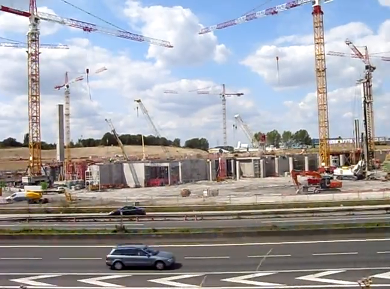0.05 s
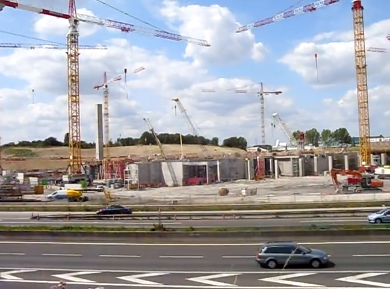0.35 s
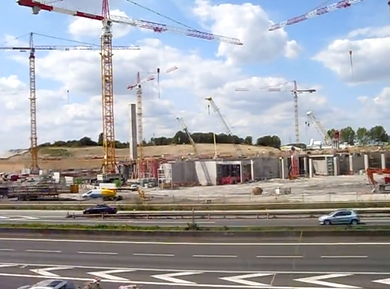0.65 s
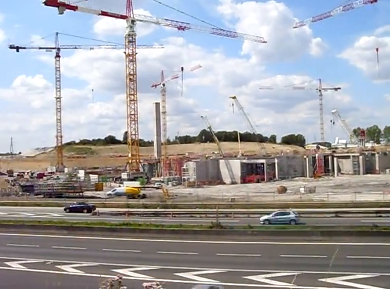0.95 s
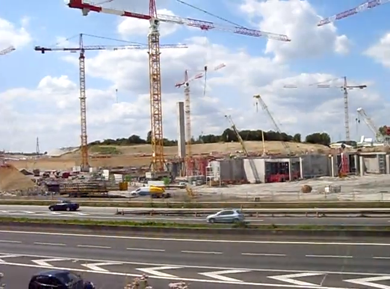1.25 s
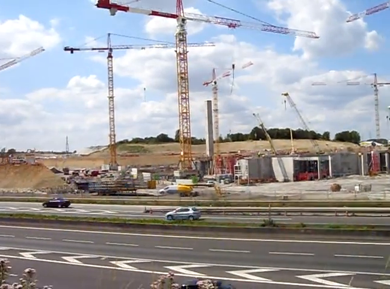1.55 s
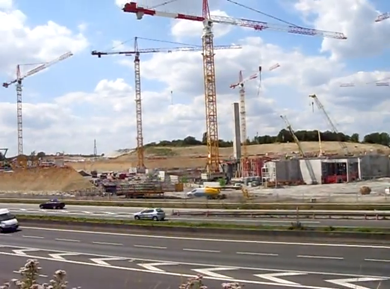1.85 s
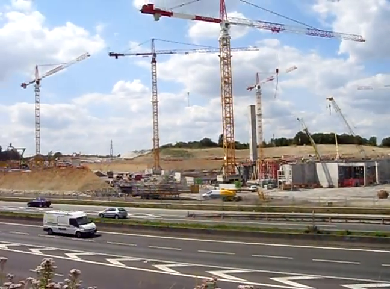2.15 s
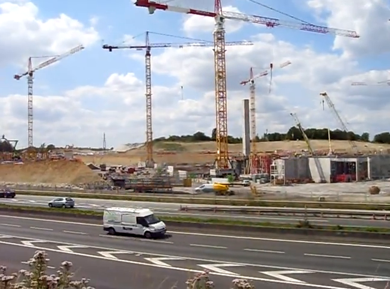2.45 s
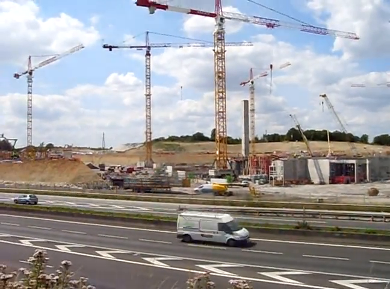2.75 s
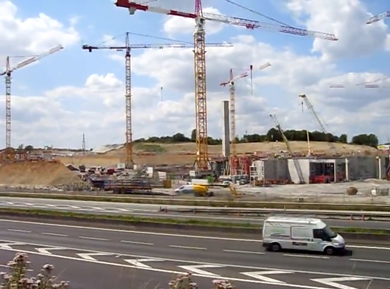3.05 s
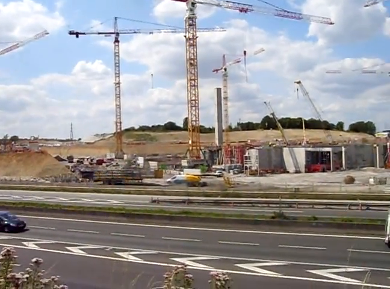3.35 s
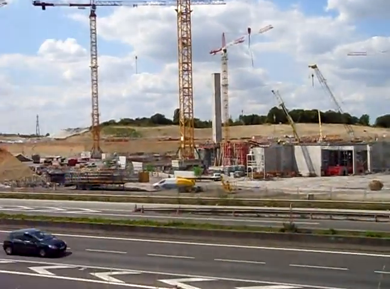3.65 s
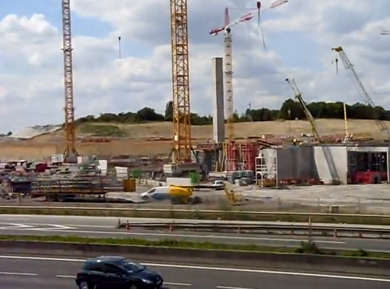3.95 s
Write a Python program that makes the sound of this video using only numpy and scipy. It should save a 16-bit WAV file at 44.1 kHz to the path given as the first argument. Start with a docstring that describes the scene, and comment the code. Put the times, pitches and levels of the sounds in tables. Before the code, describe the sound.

Cars and a van rush past on a busy road, with wind and two clicks.

```python
"""A roar of tyres and a low engine hum open on a busy fast road, heard from an embankment.
Cars and a van sweep by: roar and hiss swell as each draws near, and its hum sinks in pitch
with the Doppler shift. Under them lie far traffic and wind rumbling on a small camera's microphone.
Past the middle the camera's plastic body clicks twice, among a few faint ticks."""
import sys
import numpy as np
from scipy import signal
from scipy.fft import rfft, irfft
from scipy.io import wavfile
from scipy.ndimage import uniform_filter1d

SR = 44100
rng = np.random.default_rng(int(sys.argv[2]) if len(sys.argv) > 2 else 0)


def bounce(signal):
    """Save signal as a 16-bit WAV file at the path given by the first command-line argument."""
    frames = np.transpose(np.atleast_2d(signal))
    limited = np.clip(frames, -1, 1)
    pcm = np.round(limited * 32767).astype(np.int16)
    wavfile.write(sys.argv[1], SR, pcm)


N = 176400
T = np.arange(N) / SR

# pass-bys: (time abreast [s], distance [m], tyre roar [dB], hiss [dB], firing rate [Hz],
# engine hum [dB], half length of the hum [s])
PASS_BYS = [(.2, 22, -32, -56, 64.5, -31.5, 0.26), (1.5, 20, -36, -52, 123, -42.5, .35),
            (2.65, 16, -48, -48, 117.5, -36.5, .22), (3.119, 10, -46, -49.5, 71.87, -30.5, 0.19),
            (3.701, 22, -36, -50, 109.4, -38.5, 0.51)]
# engine harmonics: (multiple of the firing rate, relative level [dB])
ENGINE_HARMONICS = [(1, -3), (2, -17), (3, -23), (4, -22.5)]
# gliding bands of traffic sound, tyre rushes and two low engine tones:
# (peak time [s], half length [s], centre [Hz], glide [Hz/s], width [Hz], level [dB])
TRAFFIC_BANDS = [(0.404, 0.21, 2880, -150, 130, -54.5), (1.45, .3, 1284, 60, 280, -40),
                 (1.751, .3, 2262, 400, 1300, -46.5), (2.0, 0.48, 504, -0.5, 120, -45),
                 (2.446, 0.27, 2243, 101, 470, -47), (2.66, .13, 3963, 199.5, 1600, -49.5),
                 (3.162, 0.13, 2883, -400, 780, -47.5), (3.852, 0.22, 296.4, -10.5, 12, -43),
                 (3.499, 0.15, 201.3, -4.5, 9.6, -44)]
# tone colours of the noise layers: (frequency [Hz], relative density [dB])
TYRE_SPECTRUM = [(100, -10), (250, -10.5), (430, -12), (600, -6.5), (760, 4), (980, 0), (1300, -3),
                 (1900, -14.5), (3000, -25), (6000, -35.5)]
HISS_SPECTRUM = [(300, -23), (1000, -6), (1600, -9), (2100, -1), (2750, 1), (3500, 0.5), (4100, -4.5),
                 (4900, -2.5), (6000, -19)]
WIND_SPECTRUM = [(5, -6.5), (13, 3), (22, -3.5), (35, -0.5), (60, -15), (160, -38.5), (2000, -81.5)]
RUMBLE_SPECTRUM = [(15, -20.5), (35, -6), (50, 0), (70, -2), (100, -9), (150, -17.5), (400, -46.5),
                   (2000, -77.5)]
FAR_SPECTRUM = [(30, -10), (110, -5), (200, -1.5), (300, -4), (420, -9.5), (560, -1), (740, 2.5),
                (1000, -5.5), (1400, -10), (2000, -17), (2900, -18.5), (3800, -25), (5000, -27),
                (6000, -26)]
# fader rides of the wind and the traffic rumble: (time [s], level [dB])
WIND_RIDE = [(0, -30), (.9, -29), (1.7, -30.5), (2.1, -31), (2.6, -31), (2.73, -33.5), (2.87, -18.5),
             (3.1, -36), (4, -39)]
RUMBLE_RIDE = [(0, -29.5), (.8, -31), (1.65, -31), (2.1, -32), (2.65, -32), (2.88, -29), (3.15, -36),
               (4, -31.5)]
# camera clicks: (time [s], level [dB], catch relative to that [dB], brightness [Hz], pitch [ratio])
CAMERA_CLICKS = [(2.6043, -0.5, -9.5, 3100, 0.97), (3.1538, -5, -9, 1100, 1.1)]
# faint ticks of loose parts: (time [s], level [dB])
LOOSE_TICKS = [(.7775, -23.5), (1.147, -27.5), (1.8873, -24.5), (2.624, -19), (3.0617, -28.5),
               (3.225, -23.5), (3.733, -24.5)]
# resonances of the camera's body, catch and loose parts: (frequency [Hz], level [dB], 60 dB decay [s])
BODY_MODES = [(754, -18.5, 0.026), (920, -8, 0.02), (1170, -25, 0.003), (1440, -2.5, 0.0066),
              (1770, -9, 0.018)]
CATCH_MODES = [(1000, -1, 0.012), (2740, -9.5, 0.0075), (3180, -4.5, 0.0099), (3760, -11.5, 0.0029),
               (4500, -14.5, 0.0078)]
TICK_MODES = [(3300, -7.5, .006), (4160, -7, 0.0041), (5100, -6.5, 0.0037)]

SPEED_M_PER_S, SOUND_M_PER_S = 25, 343
ENGINE_WAVER = 0.0054  # rms share of the firing rate
CATCH_LEAD_S, CLICK_LOW_CUT_HZ = 0.00063, 615
ROLL_OFF_HZ, EDGE_HZ, TOP_HZ = 5180, 6020, 15500
PEAK_CEILING = 0.68  # share of full scale


def vehicle(abreast_s, distance_m, tyre_db, hiss_db, firing_hz, hum_db, hum_half_s):
    """One pass-by: tyre roar and hiss grow with nearness; the hum swells and Doppler bends it down."""
    along_m = SPEED_M_PER_S * (T - abreast_s)
    range_m = np.hypot(along_m, distance_m)
    nearness = distance_m / range_m
    doppler = 1 / (1 + SPEED_M_PER_S / SOUND_M_PER_S * along_m / range_m)
    waver = 1 + ENGINE_WAVER * drift(rate_hz=8)
    cycles = np.cumsum(firing_hz * doppler * waver) / SR
    hum = unit(sum(amp(db) * np.sin(2 * np.pi * (k * cycles + rng.random()))
                   for k, db in ENGINE_HARMONICS))
    roar = noise(TYRE_SPECTRUM)
    hiss = noise(HISS_SPECTRUM, patch_db=2.0, flicker_db=2.9)
    return (amp(tyre_db) * nearness * roar
            + amp(hiss_db) * nearness ** 2.2 * hiss  # hiss dies away faster with distance
            + amp(hum_db) * swell(abreast_s, hum_half_s) * hum)


def traffic_band(peak_s, half_s, hz, glide_hz_per_s, width_hz, db):
    """A tyre rush or low engine tone that swells, glides and fades as a vehicle moves."""
    centre_hz = hz + glide_hz_per_s * (T - peak_s)
    carrier = np.exp(2j * np.pi * np.cumsum(centre_hz) / SR)
    flutter = drift(width_hz / 2) + 1j * drift(width_hz / 2)
    return amp(db) * swell(peak_s, half_s) * (flutter * carrier).real


def camera_clicks():
    """A small catch snaps and knocks the body, sharply or dully; loose parts tick faintly."""
    clicks = np.zeros(N)
    for time_s, db, catch_db, bright_hz, pitch in CAMERA_CLICKS:
        add(clicks, time_s - CATCH_LEAD_S, amp(db + catch_db) * ring(CATCH_MODES))
        knock = cut(ring(BODY_MODES, pitch), bright_hz, "lowpass", order=4)
        add(clicks, time_s, -amp(db) * knock)
    for time_s, db in LOOSE_TICKS:
        add(clicks, time_s, amp(db) * ring(TICK_MODES))
    return cut(clicks, CLICK_LOW_CUT_HZ, "highpass", order=4)


def wind():
    """Deep buffeting on the microphone, with one stronger gust."""
    return fader(WIND_RIDE) * noise(WIND_SPECTRUM, patch_db=1.7, size=8192)


def traffic_rumble():
    """The low end of engines and car bodies, gently easing and rising."""
    return fader(RUMBLE_RIDE) * noise(RUMBLE_SPECTRUM, patch_db=1.17, flicker_db=0.9, size=8192)


def far_traffic():
    """An even bed of roar from the rest of the road."""
    return amp(-33) * noise(FAR_SPECTRUM)


def noise(spectrum, patch_db=0.5, flicker_db=0.5, size=1024):
    """Coloured noise of rms 1, with drifting patches and a flicker shared by all bands."""
    hz = np.fft.rfftfreq(size, 1 / SR)
    hop = size // 4
    frames = N // hop + 5
    real, imag, patches = rng.standard_normal((frames, len(hz), 3)).T
    patches = uniform_filter1d(patches, size=8, axis=0)  # smear across frequency
    patches = unit(uniform_filter1d(patches, size=12, axis=1))  # and across time
    curve_hz, curve_db = np.transpose(spectrum)
    colour_db = np.interp(np.log(hz + 1), np.log(curve_hz + 1), curve_db)[:, None]
    gain = amp(colour_db + patch_db * patches + flicker_db * rng.standard_normal(frames))
    _, sound = signal.istft((real + 1j * imag) * gain, nperseg=size, noverlap=size - hop)
    return unit(sound[:N])


def ring(modes, pitch=1):
    """The short ring of a struck plastic part."""
    t = np.arange(SR // 20) / SR
    return sum(amp(db - 60 * t / t60) * np.sin(2 * np.pi * hz * pitch * t) for hz, db, t60 in modes)


def drift(rate_hz):
    """Slow random wander of rms 1."""
    hz = np.fft.rfftfreq(N, 1 / SR)
    return unit(irfft(rfft(rng.standard_normal(N)) / (1 + (hz / rate_hz) ** 4), N))


def swell(peak_s, half_s):
    """A bell-shaped rise and fall."""
    return np.exp(-((T - peak_s) / half_s) ** 2 / 2)


def fader(ride):
    """Gain that slides between level points."""
    return amp(np.interp(T, *np.transpose(ride)))


def cut(x, hz, kind, order):
    """A causal high-pass or low-pass."""
    return signal.sosfilt(signal.butter(order, hz, kind, fs=SR, output="sos"), x)


def amp(db):
    """Decibels to gain."""
    return 10 ** (np.asarray(db) / 20)


def unit(x):
    """Scales to rms 1."""
    return x / np.sqrt(np.mean(x ** 2) + 1e-20)


def add(mix, time_s, sound):
    """Drops a sound into the mix on cue."""
    part = mix[round(time_s * SR):][:len(sound)]
    part += sound[:len(part)]


def scene():
    """Road, wind and camera clicks, mixed to mono."""
    bed = far_traffic() + traffic_rumble()
    vehicles = sum(vehicle(*row) for row in PASS_BYS)
    bands = sum(traffic_band(*row) for row in TRAFFIC_BANDS)
    return (bed + vehicles + bands + wind() + camera_clicks())[None]


def record(dry):
    """A narrow band dulls the top; the loudest click is lightly clipped, adding a faint bright splash."""
    band_edge, top_cut = (signal.firwin(401, hz, window=("kaiser", 9), fs=SR)[None]
                          for hz in (EDGE_HZ, TOP_HZ))
    dulled = cut(dry, ROLL_OFF_HZ, "lowpass", order=12)
    narrow = signal.oaconvolve(dulled, band_edge, "same")
    clipped = np.clip(narrow, -PEAK_CEILING, PEAK_CEILING)
    return signal.oaconvolve(clipped, top_cut, "same")


dry = scene()
out = record(dry)
bounce(out)
```